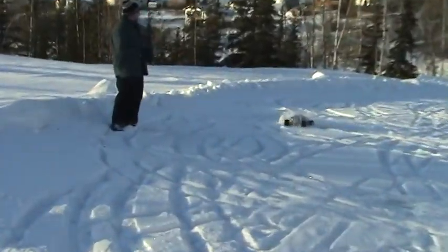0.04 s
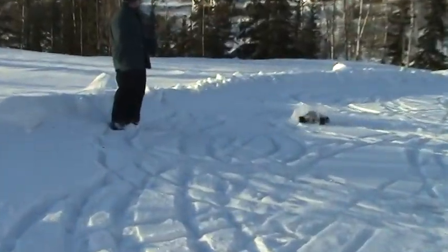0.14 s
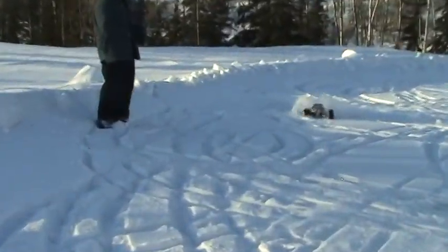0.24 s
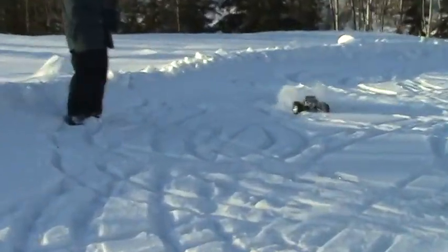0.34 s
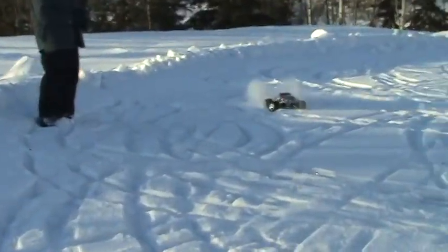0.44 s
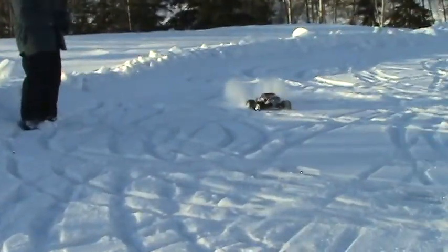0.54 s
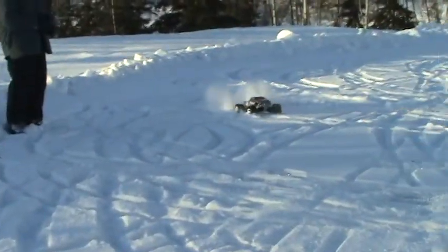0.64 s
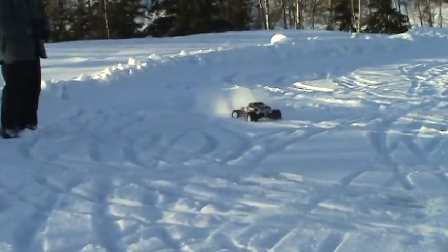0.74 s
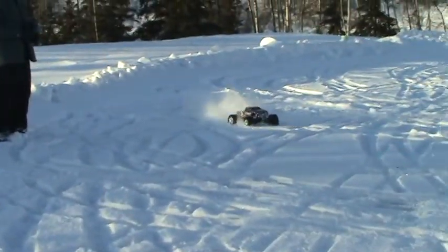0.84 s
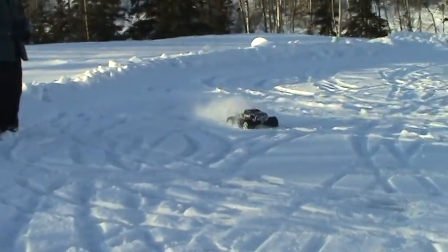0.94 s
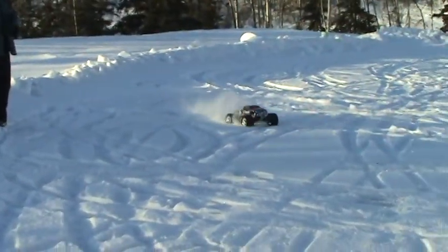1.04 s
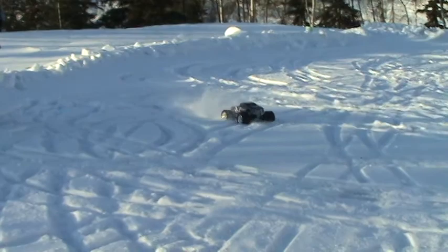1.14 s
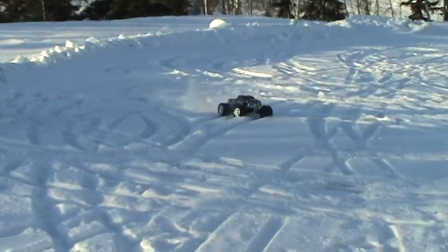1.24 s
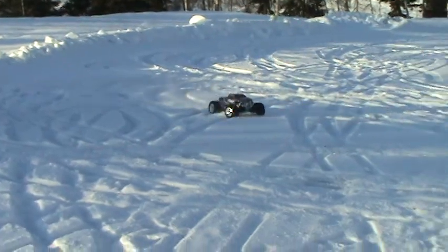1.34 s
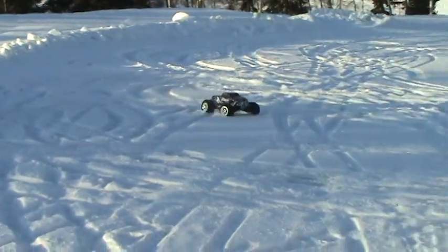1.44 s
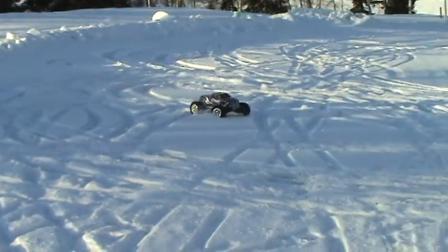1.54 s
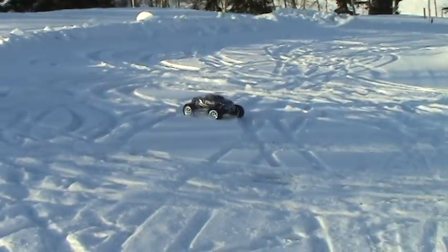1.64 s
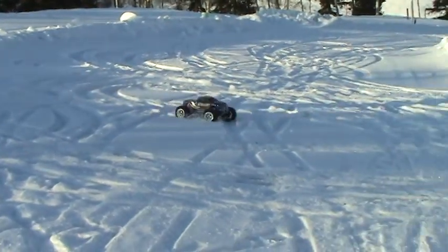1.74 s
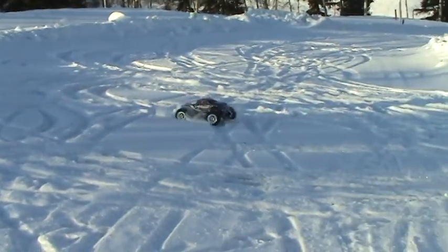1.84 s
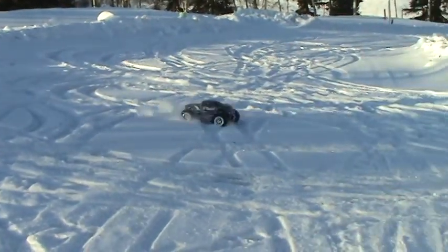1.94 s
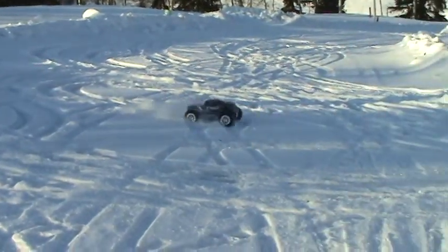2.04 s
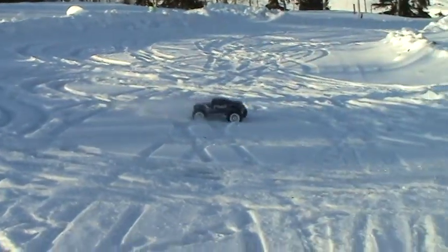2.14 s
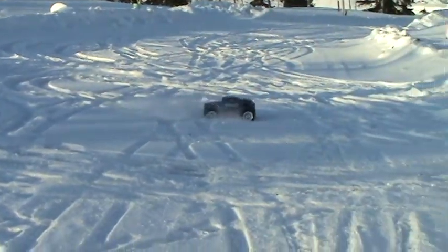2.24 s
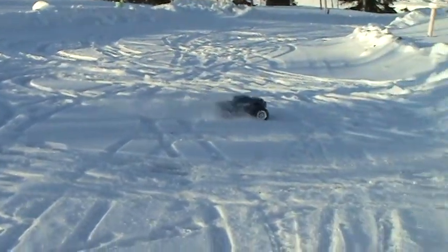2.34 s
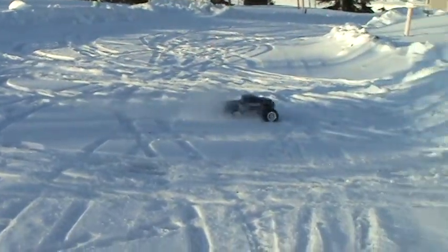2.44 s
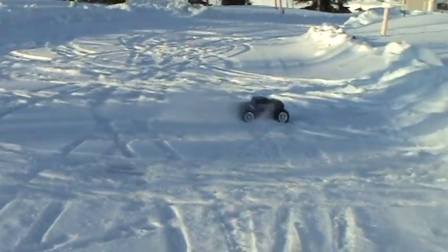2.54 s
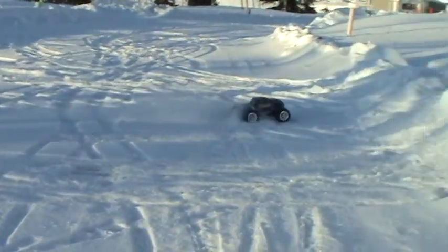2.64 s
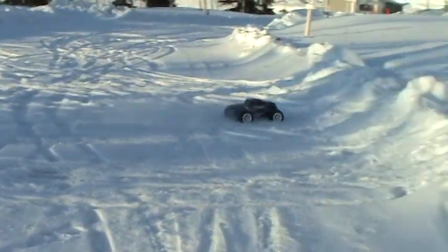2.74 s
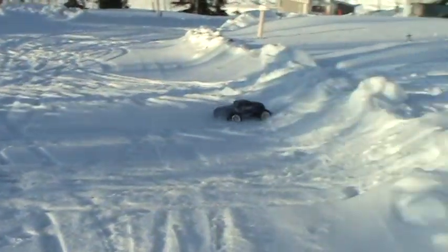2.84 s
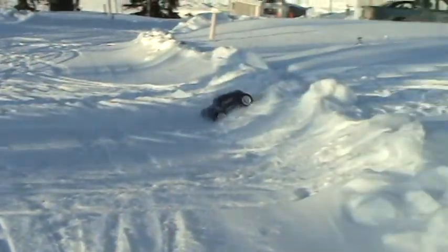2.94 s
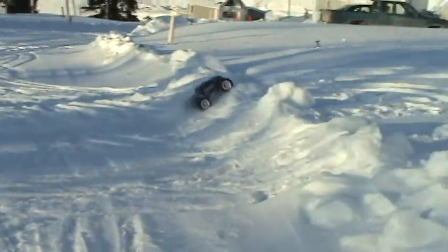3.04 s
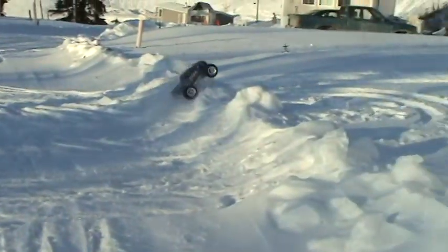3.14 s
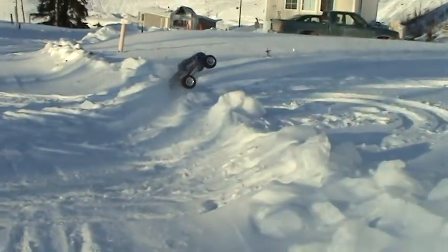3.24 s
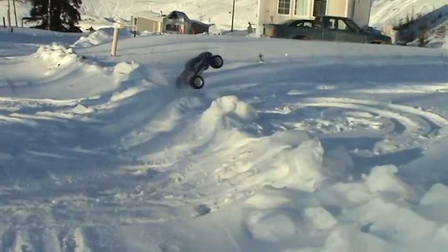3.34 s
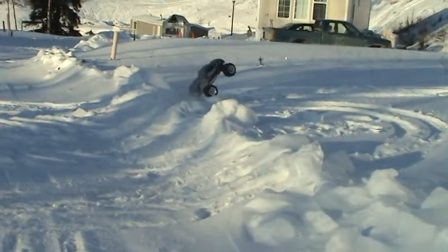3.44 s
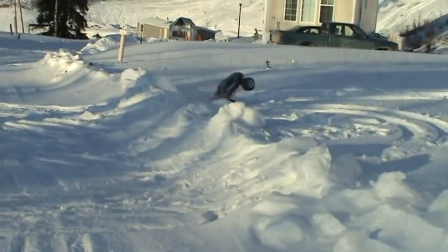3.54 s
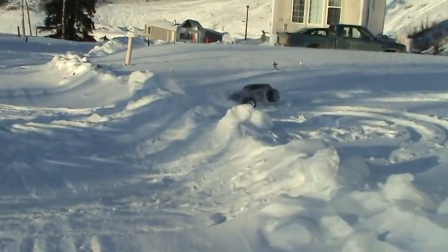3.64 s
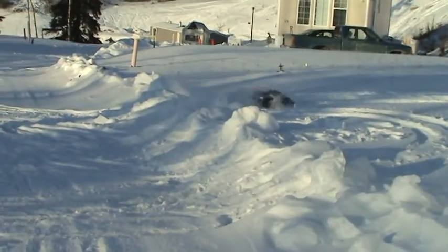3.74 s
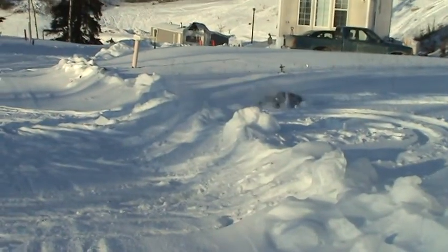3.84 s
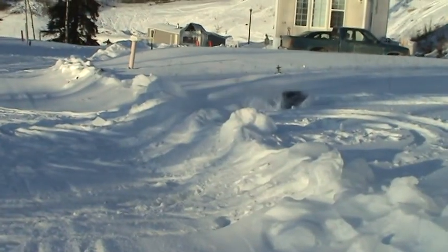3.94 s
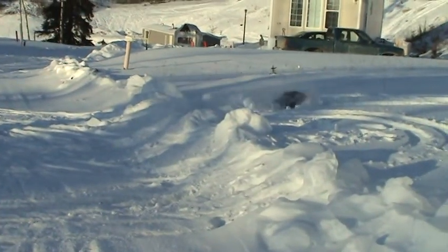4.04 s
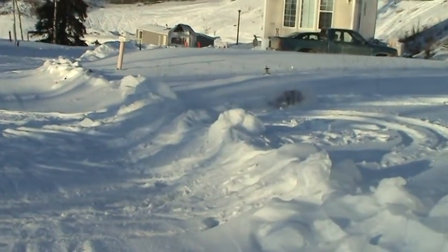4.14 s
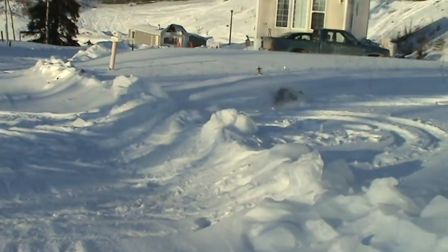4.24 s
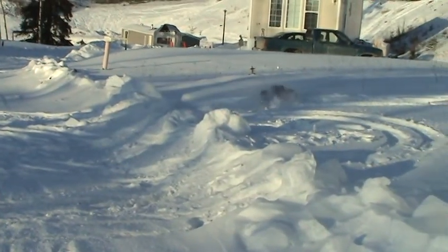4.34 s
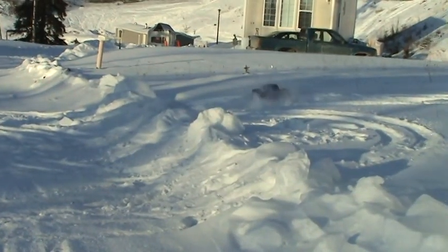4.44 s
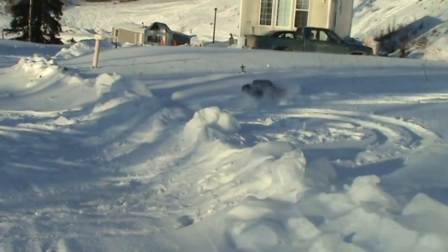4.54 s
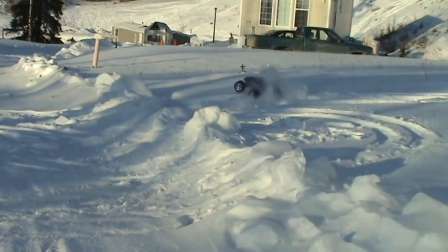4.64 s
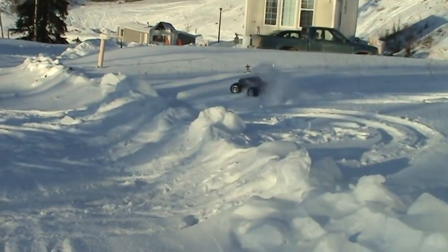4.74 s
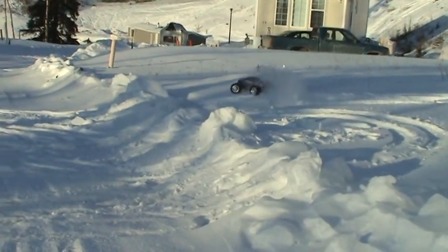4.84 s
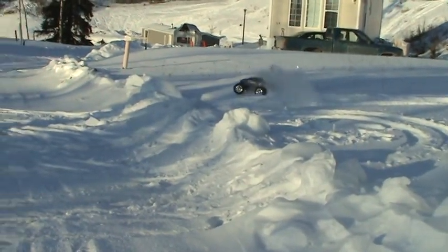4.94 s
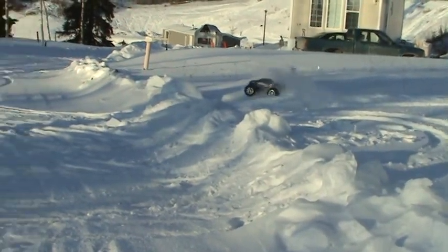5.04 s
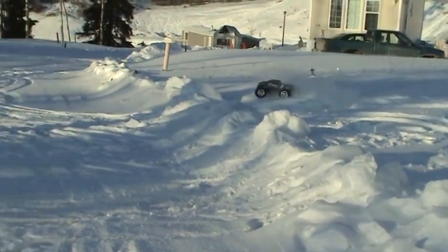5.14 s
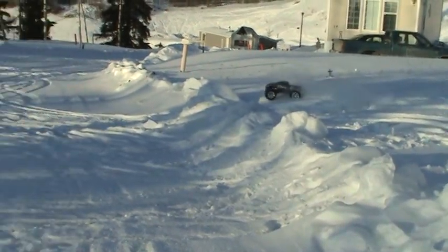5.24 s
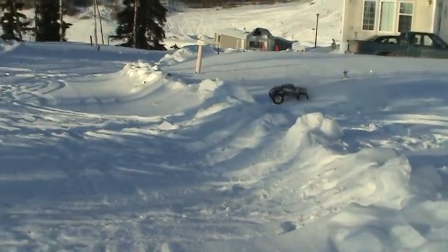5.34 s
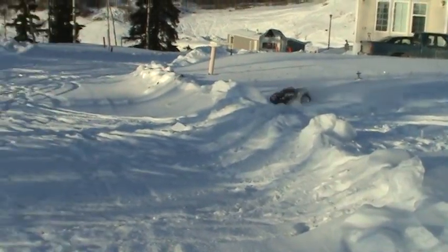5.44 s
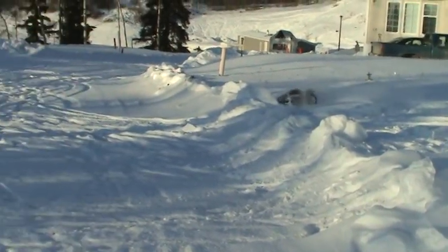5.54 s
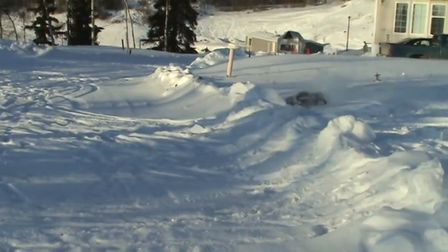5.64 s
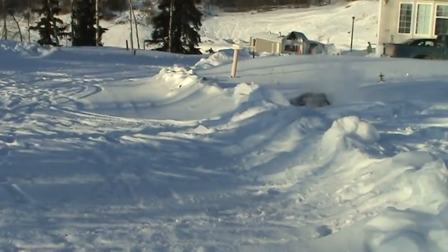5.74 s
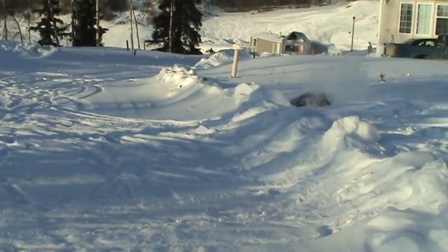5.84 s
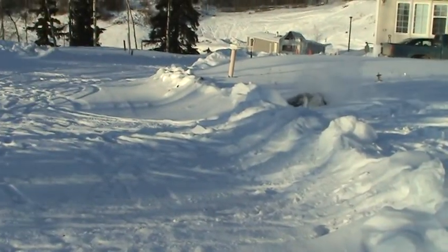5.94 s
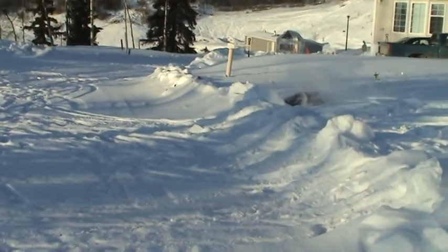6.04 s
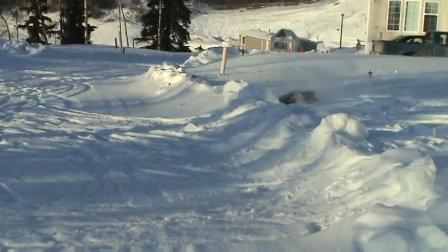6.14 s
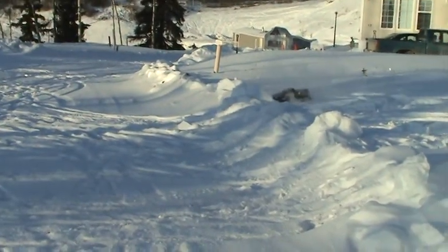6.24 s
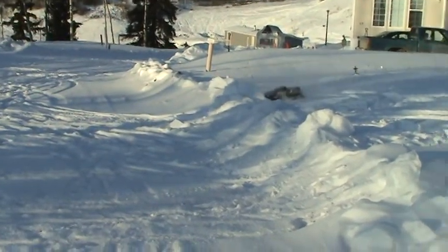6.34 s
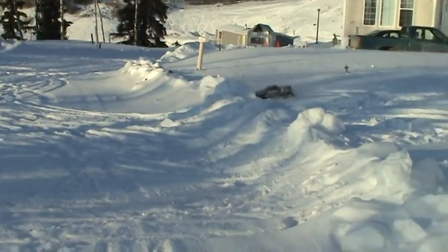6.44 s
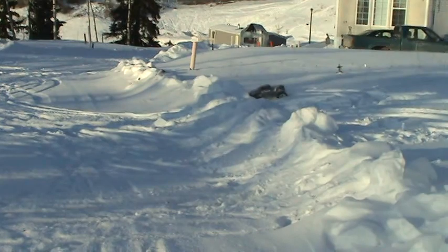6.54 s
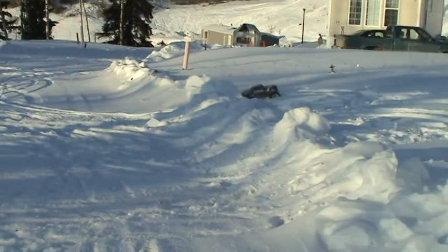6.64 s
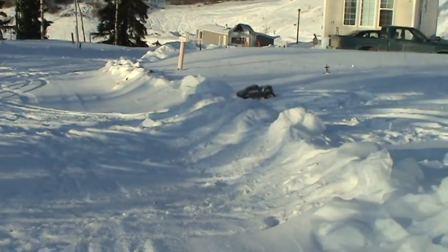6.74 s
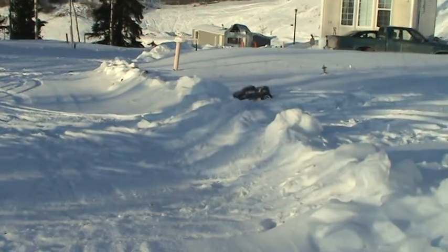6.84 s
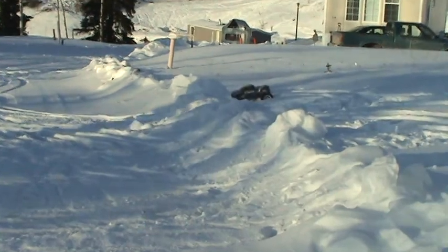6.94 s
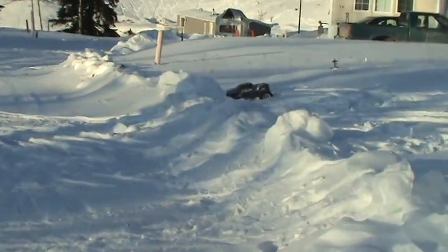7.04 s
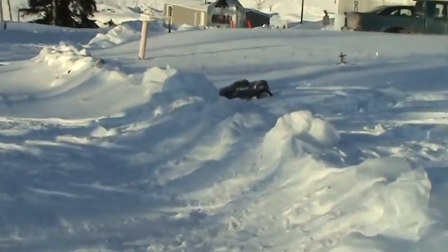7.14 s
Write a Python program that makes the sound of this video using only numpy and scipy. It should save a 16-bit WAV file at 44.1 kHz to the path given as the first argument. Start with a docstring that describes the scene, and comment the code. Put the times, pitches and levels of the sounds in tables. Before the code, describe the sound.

In a quiet snowy yard, a remote-controlled truck runs at a distance with a high, raspy gear whine and tyres knocking through ruts. The motor drops out for a moment, revs back up and holds a wavering pitch. After a jump, the gears chirp and scrape under uneven load, whine strongly again, then cut out, leaving faint ticks. Soft gusts rumble on the microphone now and then.

```python
"""A small electric truck races over snow, jumps a bank and digs in deep drifts, some metres away.
One shaft speed drives the motor hum and the gear meshes, whose tones swell in turn and cut out as it
coasts. The gears grind, rasp and squeak under uneven load; the tyres throw snow and thud into ruts.
Light wind brushes the two microphone ports in a quiet yard."""
import sys
import numpy as np
from scipy import signal
from scipy.fft import rfft, irfft, next_fast_len
from scipy.io import wavfile
from scipy.ndimage import uniform_filter1d

SR = 44100
rng = np.random.default_rng(int(sys.argv[2]) if len(sys.argv) > 2 else 0)


def master_out(mix):
    """Clip the mix to full scale and print it as 16-bit PCM to the path in sys.argv[1]."""
    frames = np.transpose(np.atleast_2d(mix))
    ceiling = np.clip(frames, -1, 1)
    pcm = np.round(ceiling * 32767).astype(np.int16)
    wavfile.write(sys.argv[1], SR, pcm)


N = 317063
T = np.arange(N) / SR
BAND_EDGE_HZ = 15700

# gear grind spectrum: freq_hz, gain_db
GRIND_SPECTRUM = [(300, -31), (700, -5.5), (1200, -9.5), (2000, 1), (3500, 2), (5000, -1.5), (8000, -2.5),
                  (10000, -7), (12000, -18), (15500, -37)]
# left-right likeness: freq_hz, coherence
COHERENCE = [(60, 0.99), (150, 1), (280, 1), (550, 0.99), (1650, 0.96), (4970, 0.99), (8000, 0.96),
             (11500, 0.99), (15000, 1)]


def amp(db):
    """Decibels to gain."""
    return 10 ** (np.asarray(db) / 20)


def unit_rms(x):
    """Scale to rms 1."""
    return x / np.sqrt(np.mean(x ** 2) + 1e-20)


def at_hz(points, hz):
    """Interpolate a spectrum on a log-frequency axis."""
    freq_hz, value = np.transpose(points)
    return np.interp(np.log(hz + 1), np.log(freq_hz + 1), value)


def curves(rows):
    """Per-sample curve of each column after time_s."""
    time_s, *columns = np.transpose(rows)
    return [np.interp(T, time_s, column) for column in columns]


def wander(cutoff_hz):
    """Low-passed random drift, rms 1."""
    lowpass = signal.butter(2, cutoff_hz, fs=SR, output="sos")
    return unit_rms(signal.sosfilt(lowpass, rng.standard_normal(N)))


def add(mix, start_s, sound):
    """Mix a short sound in place."""
    part = mix[..., round(start_s * SR):][..., :sound.shape[-1]]
    part += sound[..., :part.shape[-1]]


def noise(spectrum, coherence, patch_db, tilt_db=None, shaft_hz=None, size=512):
    """Stereo noise, rms 1, with drifting spectral patches; optional treble tilt and mesh ridges."""
    # grind gathers around the meshes: shaft_multiple, gain_db
    ridges = [(2.5, 1), (3.0, 0), (3.7, -1), (4.5, 2), (5.3, 1.5), (6.6, 1), (7.5, 2), (8.1, 2), (9.6, 4),
              (11.2, 2), (12.2, 1.5), (13.3, 1), (14.5, -0.5), (15.8, 2.2), (17, -0.5), (19.3, 4.5),
              (21, 0.5), (24, 0.5)]
    hop = size // 4
    frames, hz = N // hop + 5, np.fft.rfftfreq(size, 1 / SR)
    frame_s = np.arange(frames) * hop / SR
    a, b, c, d, patches = rng.standard_normal((frames, len(hz), 5)).T
    patches = unit_rms(uniform_filter1d(uniform_filter1d(patches, size=9, axis=0), size=7, axis=1))
    field_db = at_hz(spectrum, hz)[:, None] + patch_db * patches
    if tilt_db is not None:
        field_db += np.outer((hz / BAND_EDGE_HZ) ** 2, np.interp(frame_s, T, tilt_db))
    if shaft_hz is not None:
        multiple = np.outer(hz, 1 / np.interp(frame_s, T, shaft_hz))
        field_db += np.interp(multiple, *np.transpose(ridges))
    shared = np.clip(at_hz(coherence, hz), -1, 1)[:, None]
    left = a + 1j * b
    right = shared * left + np.sqrt(1 - shared ** 2) * (c + 1j * d)
    spectra = np.array([left, right]) * amp(field_db)
    return unit_rms(signal.istft(spectra, nperseg=size, noverlap=size - hop)[1][:, :N])


def whine(cycles, level_db, flutter_db, rough, beat=0):
    """Fluttering sine; tooth errors smear the rough share, an out-of-round gear adds the beat."""
    smear = rough * (wander(186) + 1j * wander(88)) / np.sqrt(2)
    tone = ((np.sqrt(abs(1 - rough ** 2)) + smear) * np.exp(2j * np.pi * cycles)).real
    return np.sqrt(2) * amp(level_db + flutter_db * wander(47)) * (1 + beat) * tone


def yard():
    """Faint steady outdoor air."""
    # air: freq_hz, gain_db
    spectrum = [(88, -23), (150, 8), (165, -17), (314, -2), (530, -2), (2190, -9), (2660, -11.5),
                (4150, -16.5), (15600, -25.5)]
    return amp(-49) * noise(spectrum, [(150, .33), (3000, .076), (15000, .95)], .49, size=1024)


def drone():
    """Faint low band of noise."""
    # drone band: freq_hz, gain_db
    spectrum = [(125, -20), (150, -6), (168, 0.5), (200, -31)]
    # slow fades: time_s, level_db
    levels = [(0, -47), (.6, -54), (4, -49.5), (7.2, -60)]
    return noise(spectrum, COHERENCE, .87, size=2048) * amp(curves(levels)[0])


def wind():
    """Lumpy low pressure, only partly shared by the two ports."""
    # gusts: peak_s, level_db, half_width_s, upper_rel_db
    gusts = [(.06, -34, 0.019, 7), (1.78, -33.5, 0.041, -15), (2.22, -44, 0.032, -1),
             (2.62, -55, 0.058, -8), (3.02, -40, 0.074, -3), (3.36, -30.5, 0.049, -18),
             (3.44, -36, 0.054, -12), (3.591, -41, 0.038, -7), (3.7, -44, 0.058, -25),
             (4.14, -43, 0.043, -21), (4.6, -31.5, 0.056, -9), (4.69, -30, 0.047, -9),
             (4.78, -26.5, 0.036, -8.5), (4.87, -34, 0.047, -11), (5.06, -38, 0.055, -16),
             (5.17, -38, 0.04, -7), (5.8, -48.5, 0.098, -19), (6.2, -46, 0.061, -13),
             (6.529, -47, 0.026, -15), (6.67, -37.5, 0.039, -7), (6.81, -44, 0.053, -2),
             (6.91, -44, 0.048, -7.5)]
    # low band: freq_hz, gain_db
    low_spectrum = [(15, -28), (30, -20), (43, 3.5), (90, 1), (140, -1), (300, -58)]
    # upper band: freq_hz, gain_db
    upper_spectrum = [(80, -10), (140, 16.5), (280, 6), (500, -25), (900, -69)]
    low_gain, upper_gain = amp(-51.5), amp(-61.5)  # breeze between gusts
    for peak_s, level_db, half_width_s, upper_rel_db in gusts:
        gust = amp(level_db) * np.exp(-((T - peak_s) / half_width_s) ** 2)
        low_gain += gust
        upper_gain += gust * amp(upper_rel_db)
    low = noise(low_spectrum, [(40, .95), (65, .35), (120, 0)], 1.1, size=2048)
    low *= low_gain * amp(3 * wander(15.6))
    upper = noise(upper_spectrum, [(100, -.3), (250, -.3), (500, .4)], 1.5, size=1024)
    upper *= upper_gain * amp(4 * wander(18))
    return low + upper


def settling_ticks():
    """Dull clicks of snow and chassis as the truck settles."""
    # ticks: time_s, level_db
    ticks = [(6.139, -33), (6.261, -33), (6.299, -39), (6.404, -45), (6.462, -38), (6.496, -38),
             (6.724, -48), (6.795, -36.5), (6.829, -42), (6.92, -42), (6.938, -49), (6.977, -45),
             (7.033, -41)]
    # click: freq_hz, gain_db
    spectrum = [(400, -14), (1000, 4), (2300, -3), (4000, -3), (7000, -19)]
    rise_s, decay_s = .0004, .0041
    envelope, t = np.zeros(N), np.arange(1000) / SR
    for time_s, level_db in ticks:
        add(envelope, time_s - .001, amp(level_db - 3) * (1 - np.exp(-t / rise_s)) * np.exp(-t / decay_s))
    return envelope * noise(spectrum, COHERENCE, 0, size=256)


def rut_thuds():
    """Tyres hit ruts: a quickly damped sine each."""
    # impacts: start_s, level_db, pitch_hz
    thuds = [(0.067, -14.5, 270), (0.267, -27, 245), (0.335, -28, 174), (0.567, -24.5, 328),
             (0.658, -26.5, 305), (0.937, -25, 510), (.965, -19, 820), (.985, -21.5, 1050),
             (1.173, -35, 251), (1.232, -33, 630), (1.255, -28.5, 1050), (1.007, -20, 233),
             (1.841, -24, 260), (1.886, -16, 317.1), (2.099, -14, 360), (2.13, -21, 489.5),
             (2.19, -20, 596.5), (2.199, -18, 199.3), (2.215, -21, 454), (2.24, -20, 377),
             (2.299, -19, 189.1), (2.375, -29, 286.7), (2.643, -24.5, 264.1), (3.187, -25, 211),
             (5.555, -24.5, 2020), (5.561, -30, 526), (5.561, -21, 988)]
    out, t = np.zeros(N), np.arange(2500) / SR
    envelope = t / .0029 * np.exp(1 - t / .0032)
    for start_s, level_db, pitch_hz in thuds:
        add(out, start_s, amp(level_db - 7) * np.sin(2 * np.pi * pitch_hz * t) * envelope)
    return out


def slack_rasps():
    """Bright bursts of grind as the drivetrain takes up slack; small ticks as it coasts."""
    # bursts: time_s, level_db, decay_s
    rasps = [(1.094, -17.5, 0.0059), (1.16, -27, .012), (1.167, -27, .012), (1.25, -29.5, 0.018),
             (1.696, -36, 0.0088), (4.2, -26.5, 0.0073), (5.336, -17.5, 0.031), (5.554, -17, .014),
             (5.688, -22, 0.019), (5.716, -20, 0.0089), (5.758, -22, 0.0062), (5.973, -32, 0.0055),
             (6.001, -28, 0.0074), (6.044, -44, 0.0086), (6.083, -33, 0.0062), (6.108, -33, 0.0038),
             (6.144, -36, .005), (6.202, -34, 0.0085), (6.24, -39, .005), (6.265, -39, .005),
             (6.644, -29.5, 0.003)]
    envelope = np.zeros(N)
    for time_s, level_db, decay_s in rasps:
        age = np.arange(int(6 * decay_s * SR)) / (decay_s * SR)
        add(envelope, time_s - .001, amp(level_db - 7) * (1 - np.exp(-25 * age)) * np.exp(-age ** 2))
    return envelope * noise(GRIND_SPECTRUM, COHERENCE, .67, tilt_db=np.full(N, 14), size=256)


def gear_squeaks():
    """Gears under jerky load: short rough chirps, each with a scrape."""
    # single squeaks: time_s, level_db, pitch_hz
    singles = [(3.0111, -26, 8890), (3.1039, -29, 7846), (3.5907, -26, 3688), (3.625, -30, 3866),
               (3.6491, -26, 7880), (3.686, -33, 3967), (3.77, -30, 6700), (3.825, -41, 10020),
               (4.058, -36, 10280), (4.28, -38, 4920), (4.3, -29, 5460), (4.315, -32, 4960),
               (4.327, -30, 6400), (4.36, -35, 5134), (4.49, -39, 5145), (4.52, -30, 4810),
               (4.635, -27, 5374), (5.57, -24, 8000), (3.655, -28, 3990), (3.685, -26, 7750),
               (3.715, -28, 3802), (3.751, -26, 4990), (3.7704, -33, 8700), (3.7858, -24.5, 4034),
               (3.8157, -31, 4900), (3.8452, -33, 4900), (3.8734, -36, 4030), (3.8701, -27, 8210),
               (3.9021, -25, 8420), (4.0657, -27, 5093), (4.156, -29.5, 8200), (4.232, -28, 8840),
               (4.2457, -30, 4983), (4.4802, -23.5, 8540), (4.541, -27.5, 8080), (4.555, -25.5, 4940),
               (4.576, -28, 5090), (4.604, -28, 5163), (5.5578, -27, 7995), (5.5953, -24.5, 4955),
               (5.6192, -27, 6615), (5.6886, -26, 6570), (5.7848, -26, 5124), (5.7997, -24, 7020),
               (5.8442, -31, 4940), (5.8981, -25, 6980)]
    # runs of smaller squeaks: start_s, end_s, mean_gap_s, first_db, last_db, low_hz, high_hz
    runs = [(3.57, 3.9, .05, -30, -31, 3500, 4200), (3.6, 4.6, .11, -32, -33, 7100, 8600),
            (5.65, 5.93, .04, -30, -33, 4850, 5200), (5.96, 6.3, .026, -38, -47, 4900, 5300),
            (5.97, 6.28, .04, -38, -46, 6200, 6900), (5.55, 5.92, .06, -31, -31, 6500, 7200)]
    # scrape: freq_hz, gain_db
    scrape_spectrum = [(5000, -22), (8000, 4), (11000, -1), (13000, -9), (15500, -22)]
    length_s, scrape_rel_db = .014, -11.5
    squeaks = list(singles)
    for start_s, end_s, gap_s, first_db, last_db, low_hz, high_hz in runs:
        for slot_s in np.arange(start_s, end_s, gap_s):
            late, loud, high = rng.random(size=3)
            level_db = np.interp(slot_s, [start_s, end_s], [first_db, last_db]) + 6 * (loud - .5)
            squeaks.append((slot_s + gap_s * late, level_db, low_hz + (high_hz - low_hz) * high))
    chirps, scrape_gain = np.zeros(N), np.zeros(N)
    progress = np.linspace(0, 1, int(length_s * SR))
    for time_s, level_db, pitch_hz in squeaks:
        glide_oct = 0 if 4500 < pitch_hz < 7200 else -.305
        chirp = np.sin(2 * np.pi * np.cumsum(pitch_hz * 2 ** (glide_oct * (progress - .5))) / SR)
        start_s = time_s - .002
        add(chirps, start_s, amp(level_db - 1.5) * chirp * np.sin(np.pi * progress ** .9) ** 2)
        add(scrape_gain, start_s, amp(level_db + scrape_rel_db) * np.sin(np.pi * progress ** .6) ** 2)
    scrape = scrape_gain * noise(scrape_spectrum, COHERENCE, 1.6, size=256)
    return chirps * (1 + .55 * wander(800)) + scrape


def wheelspin_revs():
    """Wheels break loose in the drift: 2nd and 3rd harmonics of the final mesh sound briefly."""
    # revs: start_s, length_s, mesh_from_hz, mesh_to_hz, second_db, third_db
    revs = [(3.965, .08, 1560, 1530, -42, -41), (4.095, .075, 1500, 1650, -41, -46),
            (4.255, .06, 1450, 1630, -39, -45), (4.405, .07, 1580, 1660, -43, -36)]
    out, shake = np.zeros(N), wander(49.8)
    for start_s, length_s, from_hz, to_hz, second_db, third_db in revs:
        count = int(length_s * SR)
        mesh_hz = np.linspace(from_hz, to_hz, count) * (1 + .022 * shake[int(start_s * SR):][:count])
        phase = 2 * np.pi * np.cumsum(mesh_hz) / SR
        tone = amp(second_db) * np.sin(2 * phase) + amp(third_db) * np.sin(3 * phase)
        add(out, start_s, tone * signal.windows.tukey(count, .4))
    return out * (1 + .5 * wander(196.5))  # tooth errors


def airborne_whine():
    """Two partials sweep up as the wheels leave the ground."""
    # spin-up: time_s, pitch_hz, level_db
    sweep = [(3.19, 2600, -60), (3.23, 3000, -38), (3.27, 3500, -34), (3.31, 3850, -37), (3.34, 4100, -32),
             (3.39, 4200, -33), (3.42, 4200, -60)]
    pitch_hz, level_db = curves(sweep)
    cycles = np.cumsum(pitch_hz * (1 + .02 * wander(90))) / SR
    airborne = (T > sweep[0][0]) & (T < sweep[-1][0])
    return airborne * (whine(cycles, level_db, 1.8, .45) + whine(1.88 * cycles, level_db - 2, 2.5, .7))


def running_noise(shaft_hz, jerk, load, grind_db):
    """Gear grind, chassis growl and thrown snow, all following the grind level."""
    # balance: time_s, snow_rel_db, grind_tilt_db, growl_rel_db
    balance = [(0, 1.5, 12, -3.5), (.6, -10, -7, -11.5), (1.05, -9.5, 5.5, -12.5), (1.2, 1.5, 0, -2),
               (1.5, -9, -12, -8.5), (1.71, -15, -39, -7), (1.9, -12, 13, -15), (2.12, -1.5, 12.5, -5.5),
               (2.6, -9, -4, -19.5), (3.2, -11.5, 13.5, -2.5), (3.36, -43, 11, -2.5), (3.5, -13, 13, 1.5),
               (3.7, -9.5, 0, -8), (3.98, -6.5, 21, -10), (4.05, -14, 6, -4.5), (4.2, -12.5, 16, -11.5),
               (4.64, -9.5, 6, -11.5), (5.1, -30, 3, -15.5), (5.6, -8.5, 9, -8), (5.9, -10, 16.5, -6),
               (6.4, 3, 6, -6), (7.19, 9, 4, -24)]
    # chassis: freq_hz, gain_db
    growl_spectrum = [(600, -15), (1000, -1.5), (1400, -1.5), (2200, 1), (3200, -29)]
    # tyres in snow: freq_hz, gain_db
    snow_spectrum = [(90, -38), (180, -0.5), (350, -3), (700, -2), (1300, -17.5), (3000, -59)]
    snow_rel_db, tilt_db, growl_rel_db = curves(balance)
    flutter_db = 90 * jerk * wander(11.7) + .79 * wander(380)
    tilt_db += 150 * jerk * wander(22)
    grind = noise(GRIND_SPECTRUM, COHERENCE, 1.6, tilt_db, shaft_hz)
    grind *= amp(grind_db - 3 + flutter_db) * load ** .021
    growl = noise(growl_spectrum, COHERENCE, 2.25) * amp(grind_db + growl_rel_db + 1.3 * wander(55))
    snow = noise(snow_spectrum, COHERENCE, 1.43) * amp(grind_db + snow_rel_db - 6 + 3.4 * wander(15.7))
    return grind + growl + snow


def tone_levels_db(grind_db):
    """Level curve per drivetrain tone: timed swells over a floor that follows the grind."""
    # swells by tone name: start_s, end_s, level_db
    swells = { "hum": [(.35, 1.02, -52), (1.03, 1.1, -44), (1.85, 1.93, -40.5), (2.1, 2.28, -37.5),
              (2.28, 2.55, -39.5), (2.62, 2.72, -50), (2.93, 3.2, -45.5), (3.35, 3.47, -48.5),
              (4.0, 4.25, -53.5), (4.62, 5.05, -61), (5.05, 5.56, -51), (5.7, 5.97, -50)],
              "octave": [(1.99, 2.07, -51), (2.17, 2.24, -42), (2.56, 2.8, -55), (3.02, 3.3, -41),
              (3.3, 3.4, -30), (3.4, 3.6, -35.5), (3.66, 3.98, -50), (4.0, 4.04, -41), (4.06, 4.33, -54),
              (4.35, 4.425, -44.5), (4.53, 4.62, -41), (4.62, 4.86, -38.5), (4.86, 5.27, -57),
              (5.27, 5.56, -49), (5.58, 5.8, -49.5)], "final": [(.65, .95, -56), (2.05, 2.11, -38),
              (2.3, 2.44, -42), (2.46, 2.62, -47), (2.62, 2.98, -40), (3.03, 3.12, -32.5),
              (3.12, 3.24, -31.5), (3.55, 3.98, -46), (4.88, 4.98, -41), (5.33, 5.56, -46.5)],
              "final 2nd": [(-.1, .4, -39), (.65, 1.04, -44), (1.82, 1.9, -34.5), (1.99, 2.07, -52),
              (2.2, 2.5, -39.5), (2.5, 2.62, -37), (2.66, 2.84, -37), (2.84, 2.93, -44), (3.12, 3.26, -37),
              (4.76, 4.9, -43), (4.92, 5.2, -42), (5.2, 5.25, -35), (5.25, 5.46, -39), (5.46, 5.56, -53),
              (5.58, 5.72, -48), (5.75, 5.96, -44.5)], "final 3rd": [(1.77, 1.81, -34), (2.28, 2.495, -37),
              (2.59, 2.685, -32), (2.72, 2.94, -41), (3.02, 3.2, -41), (3.66, 3.84, -54), (4.68, 4.77, -35),
              (4.77, 4.85, -33.5), (4.96, 5.02, -31), (5.02, 5.2, -26.5), (5.2, 5.27, -28.5),
              (5.27, 5.4, -51), (5.41, 5.55, -34.5), (5.58, 5.74, -38.5), (5.77, 5.95, -38)],
              "pinion": [(-.1, .17, -40.5), (.2, .52, -44), (.52, .68, -38), (.68, .85, -44),
              (.85, 1.02, -45), (1.035, 1.07, -31), (1.07, 1.11, -39), (1.815, 1.87, -30.5),
              (1.87, 1.93, -25), (1.995, 2.045, -29), (2.045, 2.1, -34.5), (2.15, 2.3, -29),
              (2.3, 2.49, -35.5), (2.63, 2.71, -40), (2.88, 3.27, -39.5), (4.01, 4.09, -42),
              (4.35, 4.42, -43), (4.9, 4.96, -37), (5.22, 5.5, -43), (5.685, 5.725, -29.5),
              (5.78, 5.83, -36), (5.845, 5.875, -28.5), (5.89, 5.94, -36)], "pinion 2nd": [(.01, .12, -41),
              (1.87, 1.93, -25.5), (2.03, 2.08, -25), (1.99, 2.03, -36), (2.08, 2.16, -34),
              (2.95, 3.18, -43.5), (3.76, 3.93, -52)], "side": [(.5, .95, -53), (2.3, 2.45, -52.5),
              (5.25, 5.5, -55)], "upper": [(.7, 1.0, -50), (2.33, 2.42, -37), (4.96, 5.2, -58)],
              "shrill": [(.2, .55, -49.5), (.55, 1.0, -54), (2.15, 2.32, -47), (2.32, 2.5, -53),
              (2.54, 2.72, -47.5), (2.74, 2.93, -48), (4.36, 4.42, -52)], "beside": [(2.2, 2.32, -42),
              (2.55, 2.75, -43), (2.75, 2.9, -45), (5.26, 5.4, -56), (5.4, 5.55, -59)],
              "low": [(2.3, 2.95, -45.5)], "hum 3rd": [(5.15, 5.42, -46), (5.42, 5.55, -47)],
              "low whir": [(3.31, 3.41, -39), (5.24, 5.32, -53)], "digging": [(5.22, 5.47, -38.5)]}
    faint_tones = ("pinion 2nd", "side", "upper", "shrill", "low", "beside")
    ramp_s, tone_db = .034, {}
    for name, rows in swells.items():
        gain = amp(grind_db - (42 if name in faint_tones else 25))
        for start_s, end_s, level_db in rows:
            gain += amp(level_db) * np.clip(np.minimum(T - start_s, end_s - T) / ramp_s + .5, 0, 1) ** 2
        tone_db[name] = 20 * np.log10(gain)
    return tone_db


def motor_hum(turns, jerk, tone_db):
    """Three shaft harmonics and a whir; jerky load roughens the first two harmonics."""
    hum = whine(turns, tone_db["hum"], flutter_db=3, rough=.3 + 16 * jerk)
    hum += whine(2 * turns, tone_db["octave"], 2 + 100 * jerk, .27 + 20 * jerk)
    hum += whine(3 * turns, tone_db["hum 3rd"], 3, .4)
    return hum + whine(1.42 * turns, tone_db["low whir"], 3, .4)


def gear_whine(turns, axle_turns, jerk, load, tone_db):
    """Teeth mesh at multiples of the shaft speed: final drive, pinion and fainter tones."""
    # final mesh whine, its pitch wavering against the motor hum: time_s, shaft_multiple
    final_ratio = [(0, 2.55), (2.1, 2.55), (2.2, 2.47), (2.27, 2.5), (2.39, 2.6), (2.416, 2.53),
                   (2.458, 2.48), (2.525, 2.75), (2.545, 2.57), (2.632, 2.58), (2.666, 2.47), (2.69, 2.66),
                   (2.714, 2.6), (2.78, 2.69), (2.836, 2.55), (2.852, 2.48), (2.886, 2.55), (2.97, 2.6),
                   (3.02, 2.55), (4.7, 2.52), (4.8, 2.65), (4.88, 2.53), (5.0, 2.56), (5.4, 2.53),
                   (5.5, 2.55)]
    # pinion whine, its pitch drifting against the motor hum: time_s, shaft_multiple
    pinion_ratio = [(0, 9.9), (.3, 9.8), (.47, 9.55), (.6, 9.65), (1.0, 9.75), (1.05, 9.3), (1.08, 9.3),
                    (1.92, 10.1), (2.08, 10.0), (2.17, 9.7), (2.2, 9.47), (2.46, 9.4), (2.7, 9.1),
                    (2.9, 9.1), (2.97, 10.1), (3.05, 10.0), (3.16, 9.3), (3.24, 10.1), (3.4, 9.62),
                    (5.73, 9.7), (5.79, 10.15), (5.84, 10.2), (5.865, 9.65), (5.89, 10.3)]
    runout = np.cos(2 * np.pi * .13 * turns)  # out-of-round spur gear
    final = np.cumsum(curves(final_ratio)[0] * np.gradient(axle_turns) * (1 + .9 * jerk * wander(70)))
    out = np.zeros(N)
    for order, name, rough in [(1, "final", .45), (2, "final 2nd", .5), (3, "final 3rd", .4)]:
        out += load * whine(order * final, tone_db[name] + 1.3 * wander(15), .9, rough, .097 * runout)
    pinion = np.cumsum(curves(pinion_ratio)[0] * np.gradient(turns) * (1 + 1.2 * jerk * wander(120)))
    out += load * whine(pinion, tone_db["pinion"], 1.8, np.minimum(.35 + 25 * jerk, .72), .4 * runout)
    out += whine(2 * pinion, tone_db["pinion 2nd"], 2, .88, .3 * runout)
    out += load * whine(10.4 * axle_turns, tone_db["digging"], 3.1, .6)
    out += whine(12.15 * turns, tone_db["side"], 3, .7, .5 * runout)
    out += whine(13.3 * turns, tone_db["upper"], 3, .7, .5 * runout)
    shrill = 19.3 * np.cumsum(np.gradient(turns) * (1 + .012 * wander(120)))
    out += whine(shrill, tone_db["shrill"], 2.5, .9, .7 * runout)
    out += whine(.72 * turns, tone_db["low"], 3, .5)
    return out + whine(final + turns, tone_db["beside"], 3, .5)  # shaft sideband of the final mesh


def drivetrain():
    """One shaft, shaken by uneven load and bent universal joints, drives hum, meshes and grind."""
    # motor speed: time_s, shaft_hz
    speed = [(0, 522), (.3, 557.3), (.75, 598.5), (1.0, 580), (1.15, 508.5), (1.68, 158), (1.78, 226.9),
             (1.83, 336.2), (1.86, 365.3), (1.875, 410.5), (1.92, 407.3), (1.98, 321.3), (2.08, 409.4),
             (2.15, 500.5), (2.17, 551), (2.2, 560.5), (2.46, 573), (2.5, 595.3), (2.6, 596), (2.67, 567.7),
             (2.8, 608.4), (2.9, 588), (2.97, 499.5), (3.05, 512.7), (3.16, 554.5), (3.26, 476.5),
             (3.36, 571), (3.6, 541.7), (3.7, 518), (3.9, 523), (4.05, 596), (4.35, 550.6), (4.43, 588),
             (4.55, 561.5), (4.65, 583), (4.72, 602), (4.82, 624), (4.92, 594), (5.02, 615), (5.18, 629),
             (5.25, 643), (5.38, 660.4), (5.45, 651), (5.55, 609), (5.59, 614), (5.62, 675), (5.635, 628),
             (5.66, 659), (5.68, 630.5), (5.7, 681), (5.72, 683), (5.735, 624), (5.78, 652), (5.8, 695),
             (5.815, 642.6), (5.827, 679), (5.84, 628), (5.865, 739), (5.885, 656), (5.9, 680),
             (5.915, 642), (5.93, 681), (5.95, 643), (6.1, 527.5)]
    # speed variation: time_s, jerk_fraction, joint_swing_fraction
    shake = [(0, .012, .012), (.45, .007, .011), (.95, .006, .011), (1.05, .01, .011), (2.25, .01, .014),
             (2.32, .004, .008), (2.9, .004, .008), (2.97, .015, .015), (3.24, .015, .006),
             (3.33, .004, .003), (3.58, .004, .003), (3.63, .021, .03), (4.56, .02, .03),
             (4.64, .007, .015), (4.95, .007, .032), (5.2, .007, .03), (5.27, .004, .006),
             (5.55, .004, .006), (5.61, .015, .025), (5.95, .015, .025), (6.0, .008, .02)]
    # gear grind: time_s, level_db
    grind_levels = [(0, -29), (.54, -27.5), (.6, -25.5), (1.09, -25), (1.105, -33.5), (1.145, -33.5),
                    (1.18, -30), (1.21, -45.5), (1.27, -42), (1.4, -47), (1.68, -52.5), (1.7, -35.5),
                    (1.88, -22), (1.93, -26), (1.975, -36.5), (2.0, -26), (2.7, -24), (2.92, -28),
                    (3.245, -28), (3.26, -24), (3.385, -26.5), (3.402, -32), (3.56, -36), (3.6, -31),
                    (3.72, -31), (3.94, -35), (4.29, -33.5), (4.64, -29), (4.97, -25), (5.19, -26.5),
                    (5.37, -27), (5.53, -30), (5.94, -34.5), (5.958, -40), (6.39, -49.5), (7.19, -62.5)]
    # throttle shut: start_s, end_s
    coasting = [(1.17, 1.7), (6.1, 7.3)]
    shaft_hz, grind_db = curves(speed)[0], curves(grind_levels)[0]
    jerk, joint_swing = curves(shake)
    turns = np.cumsum(shaft_hz * (1 + jerk * wander(37.6))) / SR
    wheel_rad = 2 * np.pi * .0425 * turns + .25 * wander(8)
    axle_turns = turns + np.cumsum(shaft_hz * joint_swing * np.sin(2 * wheel_rad)) / SR
    load = 1 + 22 * jerk * np.sin(wheel_rad)  # swells once a wheel turn
    tone_db = tone_levels_db(grind_db)
    tones = motor_hum(turns, jerk, tone_db) + gear_whine(turns, axle_turns, jerk, load, tone_db)
    for start_s, end_s in coasting:
        tones *= np.clip(np.maximum(start_s - T, T - end_s) / .051, 0, 1)
    return tones + airborne_whine() + running_noise(shaft_hz, jerk, load, grind_db)


def scene():
    """Truck, wind and the quiet yard, in stereo."""
    gears = drivetrain() + wheelspin_revs() + gear_squeaks() + slack_rasps()
    return gears + settling_ticks() + rut_thuds() + wind() + drone() + yard()


def record(dry):
    """Microphone housing resonances, unequal ports, then the band limit."""
    # housing peaks and dips: centre_hz, width_hz, gain_db
    housing = [(570, 50, 1.5), (805, 370, -2.5), (1403, 440, 3.5), (1728, 154, -5), (2130, 400, 2),
               (2623, 197, -6.5), (3130, 254, 3), (3580, 130, -1.5), (4010, 140, 4), (4573, 310, -3),
               (5080, 340, 3.5), (6650, 200, 0.5), (7300, 290, 3), (7960, 320, 2.5)]
    # port level difference: freq_hz, left_minus_right_db
    port_balance = [(30, -8), (60, 4), (92, -0.5), (140, 0), (210, 1), (330, 1), (500, 0), (770, 1),
                    (1170, -0.5), (1790, 1), (2740, 0), (4190, 2), (6410, -0.5), (9810, -4.5), (15000, 0)]
    # port phase difference: freq_hz, left_lead_rad
    port_phase = [(0, -0.24), (1720, 0.096), (2500, -0.12), (3100, 0.59), (4390, -0.62), (4740, -0.12),
                  (5250, -0.6), (6460, -0.39), (7410, -0.57), (8350, -0.64), (9390, 0.011), (9820, -0.94),
                  (10700, 0.069), (15200, -0.0)]
    size = next_fast_len(N + 4096)
    hz = np.fft.rfftfreq(size, 1 / SR)
    housing_db = sum(gain_db / (1 + (2 * (hz - centre_hz) / width_hz) ** 2)
                     for centre_hz, width_hz, gain_db in housing)
    left = amp(at_hz(port_balance, hz) / 2) * np.exp(.5j * at_hz(port_phase, hz))
    wet = irfft(rfft(dry, size) * amp(housing_db - 3) * np.array([left, 1 / left]), size)[:, :N]
    lowpass = signal.firwin(1023, BAND_EDGE_HZ, window=("kaiser", 9), fs=SR)
    return signal.oaconvolve(wet, lowpass[None], "same")


dry = scene()
out = record(dry)
master_out(out)
```